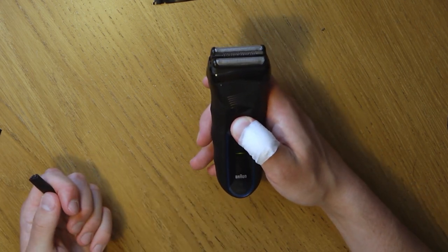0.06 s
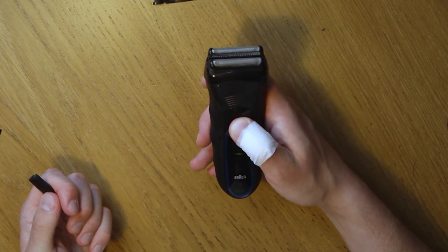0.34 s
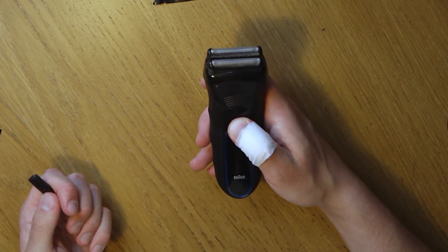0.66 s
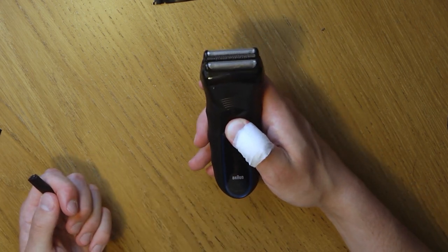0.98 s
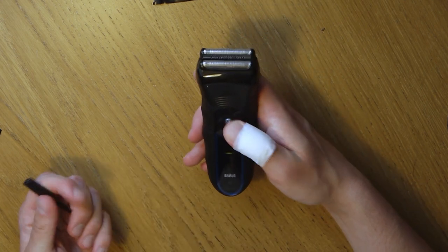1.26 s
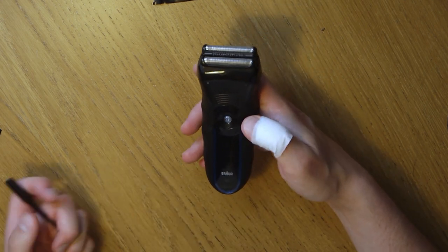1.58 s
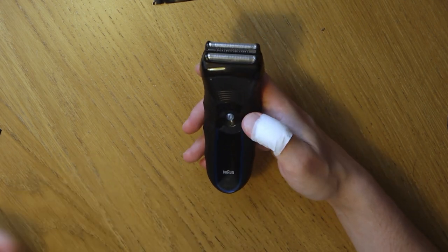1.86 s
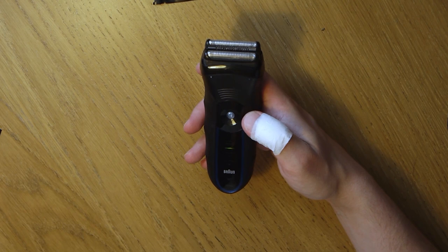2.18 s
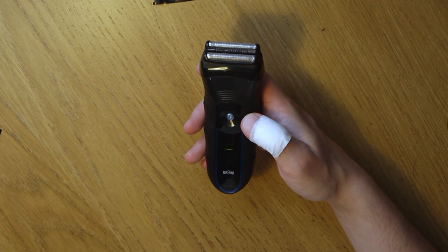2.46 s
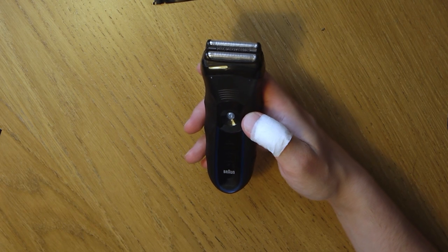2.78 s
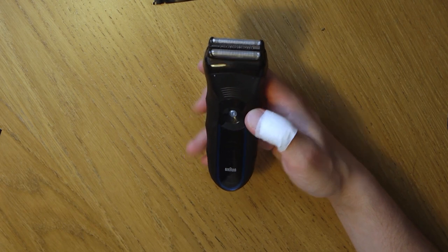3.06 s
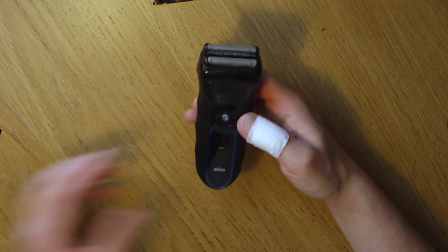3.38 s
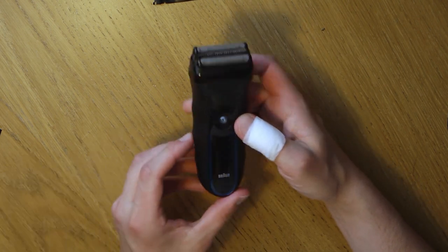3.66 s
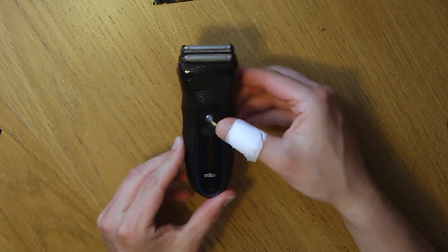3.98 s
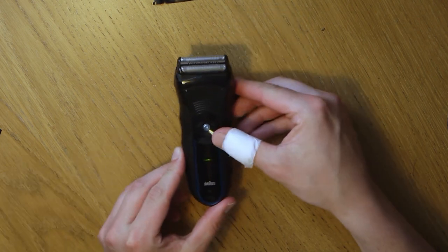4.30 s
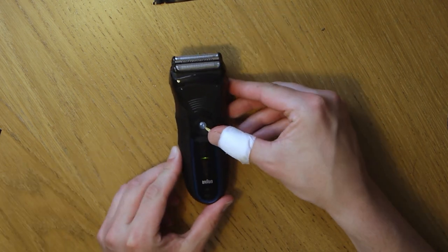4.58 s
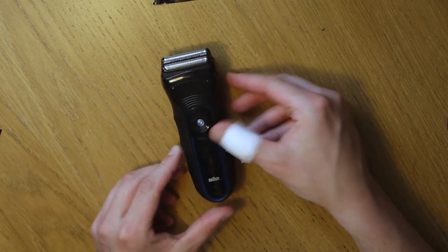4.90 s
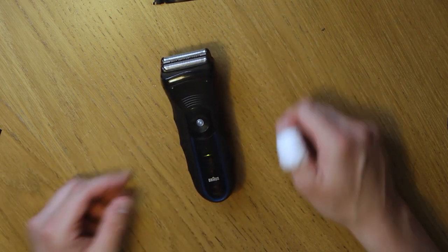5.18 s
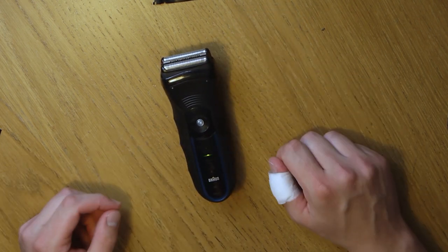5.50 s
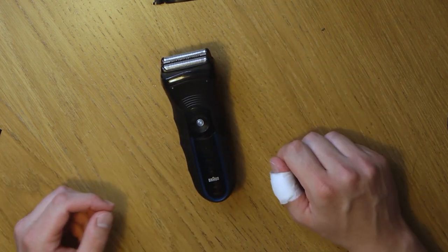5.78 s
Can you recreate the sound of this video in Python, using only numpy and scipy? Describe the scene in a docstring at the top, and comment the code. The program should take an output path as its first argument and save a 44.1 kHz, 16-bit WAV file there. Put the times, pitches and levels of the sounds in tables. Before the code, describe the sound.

Close above a wooden table in a small room, an electric shaver runs briefly with a raspy buzz, framed by small button clicks. A quiet gap follows, with only a faint fan humming and soft hand bumps. Then comes the loudest sound, a crisp plastic snap with a short ring. The shaver knocks down onto the table, rocks slightly, and hands slide quietly away over the surface.

```python
"""A shaver at a wooden table

In a small room a foil shaver is switched on, buzzes for a second and is clicked off. Its rocking
drive makes the buzz, and its blades tick and rub against the foil. A sprung plastic part slides
and snaps home, the shaver is laid down with a knock, and hands slide away over the wood.
A fan hums faintly throughout."""
import sys
import numpy as np
from scipy import signal
from scipy.fft import rfft, irfft, next_fast_len
from scipy.io import wavfile
from scipy.ndimage import uniform_filter1d, minimum_filter1d, map_coordinates

SR = 44100
rng = np.random.default_rng(int(sys.argv[2]) if len(sys.argv) > 2 else 0)


def put_to_file(sound):
    """Save the sound as 16-bit audio at rate SR, in the file named by the first command-line argument."""
    columns = np.atleast_2d(sound).T  # one column per channel
    safe = np.clip(columns, -1, 1)
    whole_steps = np.round(safe * 32767)
    wavfile.write(sys.argv[1], SR, whole_steps.astype(np.int16))


N = 266355
ON_S, OFF_S = .064, 1.038  # the motor gets and loses its current
RELEASE_DB_PER_S = 195  # how fast the buzz fades once off


def shaver():
    """One short run: the drive buzzes, the blades tick, and loose parts rattle at start and stop."""
    settled = ramp(.33, .045)  # the cutters settle into their seat: faster and a little louder
    strokes = np.cumsum(motor_speed(settled)) / SR  # strokes made so far
    rattle_share = np.clip(.004 + 1 - ramp(ON_S, .1) + ramp(OFF_S, .015), 0, .93)
    tone_gain = np.sqrt(1 - rattle_share)
    body = np.sqrt(rattle_share) * rattle(strokes) + tone_gain * drive(strokes, settled)
    body *= amp(-34.5 + .9 * settled) * running_gain(attack_s=.034)
    foil = amp(1.5) * cutters(strokes) + amp(-5) * tone_gain * foil_frame(strokes)
    return body + amp(-48) * running_gain(attack_s=.03) * foil


def motor_speed(settled, stroke_hz=137.75, creep_hz_per_s=1.35, coast_hz_per_s=170):
    """Strokes a second: the motor spins up, creeps faster a little unsteadily, and coasts down."""
    running_hz = stroke_hz + creep_hz_per_s * since(ON_S) + 1.05 * settled + .22 * wobble(14.05)
    lacking_hz = 9 * np.exp(-since(ON_S) / .045)
    return np.maximum(running_hz - lacking_hz - coast_hz_per_s * since(OFF_S), 0)


def running_gain(attack_s):
    """The buzz rises at switch-on, holds, and dies away after switch-off."""
    return (1 - np.exp(-since(ON_S) / attack_s)) * amp(-RELEASE_DB_PER_S * since(OFF_S))


# The drive's tones before and after the cutters settle: stroke_multiple, relative_db
LOOSE_TONES = [(1, -24), (2, -28), (3, -24), (4, -37), (5, -12.5), (6, -13.5), (7, -8.5), (8, -0.5), (9, 0),
               (10, -13), (11, -1.5), (12, -7), (13, -0.5), (14, -2), (15, -5.5), (16, -6.5), (17, -17),
               (18, -15), (19, -9), (20, -14), (21, -16), (22, -2), (23, 0), (24, -20), (25, -10),
               (26, -25), (27, -22)]
SETTLED_TONES = [(1, -31), (2, -30), (3, -33), (4, -41), (5, -25), (6, -19.5), (7, -20), (8, -8), (9, 2),
                 (10, -13.5), (11, -7), (12, -27), (13, -13.5), (14, -8.5), (15, -14), (16, -7.5),
                 (17, -13.5), (18, -10), (19, -13), (20, -16.5), (21, -19), (22, -2), (23, -14), (24, -15),
                 (25, -27), (26, -14), (27, -20), (28, -25), (29, -35), (30, -18)]


def drive(strokes, settled):
    """The rocking drive pushes once a stroke; its mix of tones shifts as the cutters settle."""
    loose = harmonics(strokes, LOOSE_TONES, spread=.21)
    seated = harmonics(strokes, SETTLED_TONES, spread=.15)
    return np.sqrt(1 - settled) * loose + np.sqrt(settled) * seated


def rattle(strokes):
    """Loose parts chatter most at the turn of the stroke, and harder once the drive stops pulling."""
    pulse = unit(amp(1.5 * np.cos(2 * np.pi * strokes)))
    clatter = noise([(500, -20), (950, 6.5), (1650, 4.5), (2400, 1), (3300, -3.5), (4200, -17),
                     (6000, -24)])
    return amp(np.where(since(OFF_S) > 0, .5, -2)) * pulse * clatter


# Tone colour of the blades against the foil: pitch_hz, relative_db
FOIL_COLOUR = [(500, -33), (1000, -11), (3000, 1), (3900, 0), (4500, -3), (5200, -1), (6400, -7),
               (7100, -3), (8000, -7), (9700, -4.5), (10400, -2.5), (11800, -6), (13300, -17), (15500, -24)]


def cutters(strokes, jitter_s=.000011, rub_db=-4):
    """The blades tick at each stroke and rub the foil in between."""
    tick_at = np.interp(np.arange(1, int(strokes[-1])), strokes, np.arange(N))
    jitter, size_db = rng.standard_normal((2, N // 100))[:, :len(tick_at)]
    tick_at += jitter_s * SR * jitter
    # a tick falls between samples, so it is shared among its neighbours
    nearby = tick_at.astype(int)[:, None] + np.arange(-7, 9)
    shares = amp(size_db)[:, None] * np.sinc(nearby - tick_at[:, None])
    ticks = np.bincount(np.clip(nearby, 0, N - 1).ravel(), shares.ravel(), N)
    ticks = signal.fftconvolve(ticks, ring_in_room(ring_s=.018, room_db=5.5))[:N]
    rub = rng.standard_normal(N) * amp(3.1 * np.cos(2 * np.pi * strokes - 1))
    blades = unit(ticks) + amp(rub_db) * unit(rub)
    return unit(coloured(blades, lambda hz: along(FOIL_COLOUR, hz)))


# Tones of the foil's frame: stroke_multiple, relative_db
FRAME_TONES = [(31, -5.5), (32, -4), (34, 3), (35, -9), (37, -4), (38, -2), (40, -14), (41, -6), (42, -5),
               (49, -2), (52, -2), (59, -11), (61, -10), (68, -7), (74, -7), (75, -9), (79, -14), (84, -10)]


def foil_frame(strokes):
    """The foil's steel frame sings on a few high multiples of the stroke rate."""
    return harmonics(strokes, FRAME_TONES, spread=.34, waver_db=1, drift=.0047)


# Clicks of the button: start_s, level_db, brightness_db_per_octave
BUTTON_CLICKS = [(.003, -35.5, 9.5), (.1805, -34, 1), (.186, -39, 1.5), (.9835, -37.5, 4), (.987, -38, 7),
                 (.991, -35.5, 13), (1.1472, -32, 0), (1.1525, -46, -3), (1.1625, -45.5, 0)]
# Their tone colour: pitch_hz, relative_db
BUTTON_COLOUR = [(290, -35), (600, -17), (1100, -18), (1750, -3.5), (2400, -9.5), (3200, 2), (4300, -6.5),
                 (5200, -4), (6700, -16.5), (9000, -15), (11000, -21.5), (15500, -42)]


def button():
    """The plastic button gives small clicks around switch-on and switch-off."""
    return strikes(BUTTON_CLICKS, BUTTON_COLOUR, ring_s=.034, room_db=-4)


# The sprung part's hits on its stop: start_s, level_db, brightness_db_per_octave
SNAP_HITS = [(3.0342, -15, 1.5), (3.0366, -6, -1), (3.056, -13, 3)]
# Tone colours of the slide and of the struck case: pitch_hz, relative_db
SCRAPE_COLOUR = [(180, -47), (300, -15), (968, 2.5), (1180, -2.5), (1460, -2), (1840, -10.5), (3180, -6.5),
                 (5570, -1.5), (6680, -5), (10600, -11), (15500, -32.5)]
CASE_COLOUR = [(70, -45), (170, -28), (330, -15), (480, -12), (750, -7.5), (900, -15.5), (1100, -5),
               (1500, 0), (2000, -1.5), (2550, 2.5), (3300, -3), (4400, -5), (8000, -8), (11000, -15),
               (15500, -39)]
# Ringing notes of the plastic case and the steel cutter head: pitch_hz, relative_db, ring_s
CASE_NOTES = [(765, -7, .33), (1013, -2, .31), (1076, 0, .28), (1257, -2, .31), (1417, -6, .27),
              (1535, -1, .25), (1578, -2, .25), (1744, -4, .27), (2000, -4, .25), (2059, -4, .27),
              (2335, -1, .26), (2427, -2, .32), (2485, -2, .22), (2648, -3, .22), (2950, -4, .22),
              (3458, -6, .28), (3545, -6, .27), (3929, -7, .33), (4005, -6, .32), (4565, -4, .32),
              (5108, -9, .31), (7458, -9, .25), (9515, -12, .23)]
HEAD_NOTES = [(785, -6, .55), (1320, 0, .95)]


def snap(slide_s=2.982, fade_db_per_s=133):
    """The sprung part scrapes along its guide, then hits its stop and rings the case and head."""
    hit_s = SNAP_HITS[1][0]
    sliding = ramp(slide_s, .0028) * (1 - ramp(hit_s, .0028))
    fading = amp(-28 - fade_db_per_s * since(slide_s))
    yank = amp(-17) * np.exp(-np.abs(np.arange(N) / SR - hit_s) / .003)  # the spring's last pull
    scrape = sliding * (fading + yank) * amp(1.8 * wobble(400)) * noise(SCRAPE_COLOUR)
    ring = amp(-12) * ringing(hit_s, CASE_NOTES) + amp(-37) * ringing(hit_s, HEAD_NOTES)
    return scrape + ring + strikes(SNAP_HITS, CASE_COLOUR, ring_s=.061, room_db=2.5)


# Knocks on landing, then taps as the case tips: start_s, level_db, brightness_db_per_octave
LANDING_KNOCKS = [(4.5602, -25.5, 1.3), (4.569, -33.5, 5.5), (4.575, -29.5, -2), (4.584, -32.5, -3),
                  (4.621, -40.5, -4.5)]
TIPPING_TAPS = [(4.8122, -36.5, -2.5), (4.819, -47, 2), (4.824, -43.5, -4)]
# Tone colours of the knocks and of the taps: pitch_hz, relative_db
WOOD_COLOUR = [(40, -27), (70, -8), (140, -8), (250, 7), (370, -3), (700, -5.5), (1050, -2.5), (1500, -11),
               (1800, 1), (2600, -1.5), (3300, -7.5), (5000, -16), (7000, -18.5), (11000, -32),
               (15000, -49)]
TAP_COLOUR = [(150, -20), (400, -17), (900, -19), (1300, -12), (1650, -5.5), (1900, -7), (2280, -3.5),
              (2600, -8), (3300, -10), (4200, -9.5), (6000, -21), (8500, -27), (10500, -26), (14000, -42)]
# Ringing notes of the table top: pitch_hz, relative_db, ring_s
WOOD_NOTES = [(71.4, -12, .55), (151.6, -8, 0.17), (201, -6, 0.22), (255, -8, 0.33), (440.4, -10, 0.29),
              (707, 0, 0.19), (760, -8, 0.26), (1027, -3.5, 0.26), (1136, 4, 0.14), (1690, 3, 0.13),
              (1820, -5, .19), (2510, -2, 0.077), (2794, 4.5, 0.1), (3140, -5, 0.086), (4010, -2, 0.13)]


def put_down():
    """The shaver lands, rocks on the table top and tips over a little further."""
    knocks = strikes(LANDING_KNOCKS, WOOD_COLOUR, ring_s=.059, room_db=-6.5)
    ring = amp(-28.5) * ringing(LANDING_KNOCKS[0][0], WOOD_NOTES)
    return knocks + ring + strikes(TIPPING_TAPS, TAP_COLOUR, ring_s=.033, room_db=-1)


# Sweeps of skin and sleeve over the wood: start_s, length_s, level_db
HAND_SWEEPS = [(3.59, 0.16, -63.5), (3.86, 0.17, -56), (3.99, .17, -59), (4.12, 0.15, -65),
               (4.936, .56, -49.5), (5.94, .2, -57.5)]
# Their tone colour: pitch_hz, relative_db
SKIN_COLOUR = [(880, -29), (1500, -4), (1840, -4), (2150, -4.5), (2370, -4), (4060, -5.5), (5450, -8),
               (10600, -11), (15500, -27)]


def hand_sweeps():
    """Hands brush over the wood, louder as each sweep speeds up and softer as it slows."""
    loudness = sum(amp(db) * np.abs(np.sin(np.pi * ramp(start_s, length_s))) ** 1.3
                   for start_s, length_s, db in HAND_SWEEPS)
    return loudness * amp(.6 * wobble(35)) * noise(SKIN_COLOUR)


# Soft bumps of the hands: start_s, level_db, pitch_hz
HAND_BUMPS = [(2.13, -46.5, 870), (2.25, -44, 463), (2.29, -48, 460), (3.642, -45.5, 530),
              (5.055, -45, 205), (5.064, -52.5, 90), (5.525, -42, 514), (5.529, -45.5, 1110),
              (5.895, -43, 486), (5.909, -49, 1130), (5.945, -48, 470)]


def hand_bumps(width_octaves=.43, ring_s=.24, rise_s=.0027):
    """Hands bump the table; soft flesh gives a slow rise and no crack."""
    out, t = np.zeros(N), np.arange(SR // 2) / SR
    for start_s, db, pitch_hz in HAND_BUMPS:
        thud = coloured(rng.standard_normal(SR),
                        lambda hz: -30 * np.log10(1 + (np.log2((hz + 1) / pitch_hz) / width_octaves) ** 2))
        loudness = amp(db - 60 * t / ring_s) * (1 - np.exp(-t / rise_s))
        add(out, start_s, loudness * unit(thud[-len(t):]))
    return out


# The fan's hums: pitch_hz, width_hz, level_db
FAN_HUMS = [(221.8, 3.6, -60.5), (438.2, 4, -58.5), (218.2, 45, -63), (295, 45, -65), (460, 77, -68.5),
            (513, 12, -71)]
# Tone colour of the air noise from fan and room: pitch_hz, relative_db
AIR_COLOUR = [(12, -54.5), (25, -21), (40, -12), (103, -10.5), (133, -10), (219, -14.5), (245, -9.5),
              (282, -7.5), (404, -9.5), (439, -5.5), (597, -9.5), (1450, -12.5), (1670, -14.5), (5690, -28),
              (14300, -41), (15500, -39.5)]


def fan():
    """Steady airflow with a few hums; a faint airy whistle swells near the end."""
    hum = sum(amp(db) * hum_band(hz, width_hz) for hz, width_hz, db in FAN_HUMS)
    whistle = amp(-59) * ramp(4.27, 1.1) * hum_band(hz=1437, width_hz=110)
    return hum + whistle + amp(-51 + 1.06 * wobble(15)) * noise(AIR_COLOUR)


# How long the room's echo takes to fade by 60 dB: pitch_hz, ring_s
ROOM_ECHO = [(100, 0.47), (500, 0.37), (2000, 0.27), (6000, 0.27), (11000, 0.23), (16000, 0.097)]


def ring_in_room(ring_s, room_db):
    """A struck object's crowded notes fade by 60 dB in ring_s, and the room echoes them."""
    hz, t, bands = signal.stft(rng.standard_normal(SR // 2), SR, nperseg=256)
    echo = signal.istft(bands * amp(-60 * t / along(ROOM_ECHO, hz)[:, None]), SR, nperseg=256)[1]
    direct = rng.standard_normal(len(echo)) * amp(-60 * np.arange(len(echo)) / SR / ring_s)
    return unit(direct) + amp(room_db) * unit(echo)


def strikes(hits, colour, ring_s, room_db):
    """Blows on one object, each with its own loudness and brightness."""
    out = np.zeros(N)
    for start_s, db, brightness in hits:
        blow = coloured(ring_in_room(ring_s, room_db),
                        lambda hz: along(colour, hz) + brightness * np.log2(np.maximum(hz, 200) / 2000))
        add(out, start_s, amp(db) * onset_unit(blow))
    return out


def ringing(start_s, notes):
    """A blow sets an object's own notes ringing; each fades by 60 dB in its ring_s."""
    out, t = np.zeros(N), np.arange(SR) / SR
    ring = sum(amp(db - 60 * t / ring_s) * np.sin(2 * np.pi * (hz * t + rng.random()))
               for hz, db, ring_s in notes)
    add(out, start_s, onset_unit(ring * (1 - np.exp(-t / .0015))))
    return out


def harmonics(strokes, tones, spread, waver_db=.9, drift=.006):
    """Tones at whole multiples of the stroke rate; each wavers a little, the high ones more."""
    out = np.zeros(N)
    on = slice(0, round((OFF_S + 60 / RELEASE_DB_PER_S) * SR))  # until the buzz has died away
    for multiple, db in tones:
        lag = .009 * multiple ** 2 + spread * rng.standard_normal()  # the case smears each push in time
        cycles = multiple * strokes[on] - lag + drift * multiple * wobble(40.46)[on]
        out[on] += amp(db + waver_db * multiple / 20 * wobble(16.5)[on]) * np.cos(2 * np.pi * cycles)
    return out / np.sqrt(sum(amp(db) ** 2 for _, db in tones) / 2)


def hum_band(hz, width_hz):
    """A wavering hum; the narrower it is, the more of it is steady tone."""
    sway = wobble(2 * width_hz) + 1j * wobble(2 * width_hz) + 12 / width_hz
    return unit(np.real(sway * np.exp(2j * np.pi * hz * np.arange(N) / SR)))


def noise(colour):
    """Noise of strength 1, shaped by (pitch_hz, relative_db) points."""
    return unit(coloured(rng.standard_normal(N), lambda hz: along(colour, hz)))


def coloured(x, gain_db):
    """Turn each pitch in x up or down by gain_db(hz)."""
    size = 2 * next_fast_len(len(x) // 2 + 4096)
    shape = irfft(np.log(amp(gain_db(np.fft.rfftfreq(size, 1 / SR))) + 1e-6))
    # fold the filter so that it rings only after a sound, never before
    shape[1:size // 2] *= 2
    shape[size // 2 + 1:] = 0
    return irfft(rfft(x, size) * np.exp(rfft(shape)))[:len(x)]


def wobble(rate_hz):
    """A smooth curve through rate_hz random points a second."""
    points = rng.standard_normal(int(N * rate_hz / SR) + 4)
    coarse = np.arange(0, N, 64)
    return np.interp(np.arange(N), coarse, map_coordinates(points, [coarse * rate_hz / SR]))


def along(points, hz):
    """Read between (pitch_hz, value) points, with octaves evenly spaced."""
    pitches, values = np.transpose(points)
    return np.interp(np.log(hz + 1), np.log(pitches + 1), values)


def amp(db):
    """Decibels to gain."""
    return 10 ** (np.asarray(db) / 20)


def unit(x):
    """Scale to an average strength (rms) of 1."""
    return x / np.sqrt(np.mean(x ** 2) + 1e-20)


def onset_unit(x):
    """Scale so that the first 10 ms have strength 1."""
    return x / np.sqrt(np.mean(x[:SR // 100] ** 2))


def add(track, start_s, sound):
    """Mix a sound into the track at start_s."""
    part = track[max(round(start_s * SR), 0):][:len(sound)]
    part += sound[:len(part)]


def since(start_s):
    """Seconds gone by since start_s, 0 before it."""
    return np.maximum(np.arange(N) / SR - start_s, 0)


def ramp(start_s, length_s):
    """A straight rise from 0 to 1 that then stays at 1."""
    return np.minimum(since(start_s) / length_s, 1)


def scene():
    """Everything at the table, heard from just above it in one channel."""
    return (button() + shaver() + snap() + put_down() + hand_sweeps() + hand_bumps() + fan())[None]


def record(dry, threshold_db=-13, hold_s=.032, attack_s=.0025, release_s=.071, top_hz=15800):
    """Automatic volume dips at the snap and creeps back; peaks are rounded, the top treble is cut."""
    t = np.arange(N) / SR
    level_db = 10 * np.log10(np.abs(uniform_filter1d(dry[0] ** 2, SR // 250)) + 1e-12)
    over_db = np.maximum(level_db - threshold_db, 0)
    window = 2 * int(hold_s * SR / 2) + 1
    held_db = -minimum_filter1d(-over_db, window, origin=window // 2)
    dip_db = np.maximum.accumulate(held_db * np.exp(t / release_s)) * np.exp(-t / release_s)
    lag = np.exp(-1 / (attack_s * SR))  # the dip comes late enough to let the first crack through
    dipped = dry * amp(-signal.lfilter([1 - lag], [1, -lag], dip_db))
    rounded = dipped / (1 + (np.abs(dipped) / .85) ** 8) ** (1 / 8)
    size = next_fast_len(N + SR // 2)
    kept = np.fft.rfftfreq(size, 1 / SR) < top_hz
    return irfft(rfft(rounded, size) * kept, size)[..., :N]


dry = scene()
out = record(dry)
put_to_file(out)
```